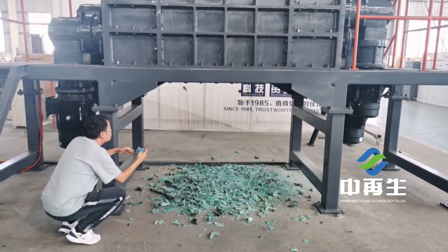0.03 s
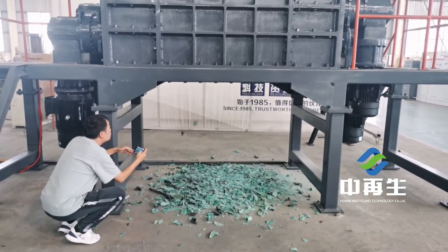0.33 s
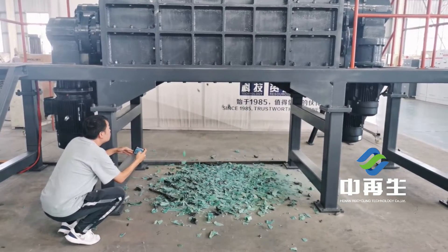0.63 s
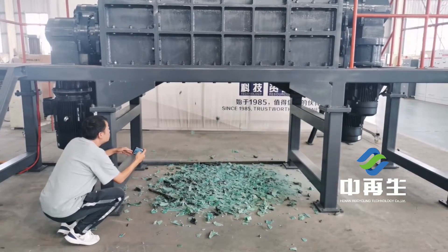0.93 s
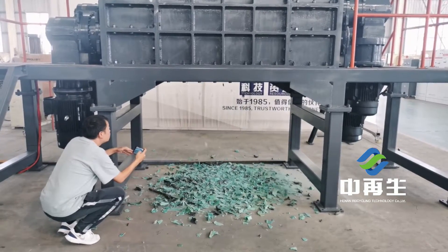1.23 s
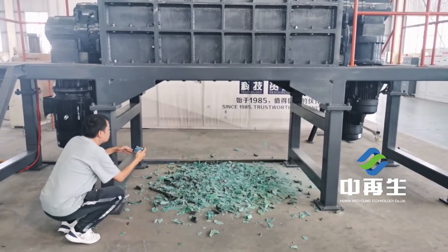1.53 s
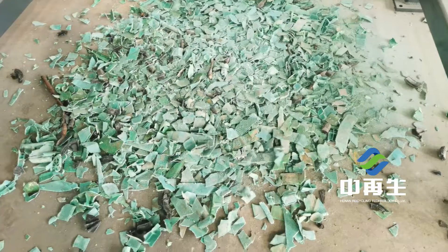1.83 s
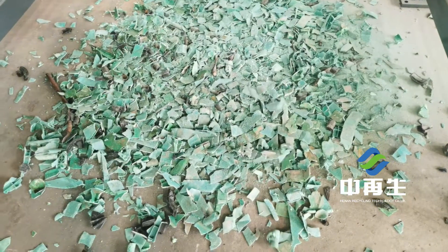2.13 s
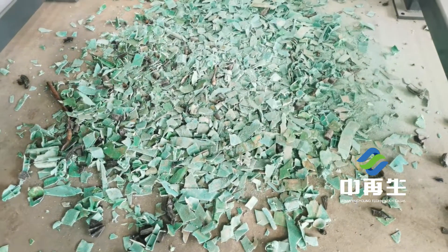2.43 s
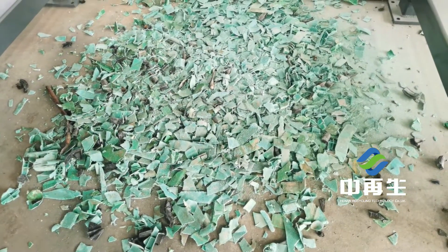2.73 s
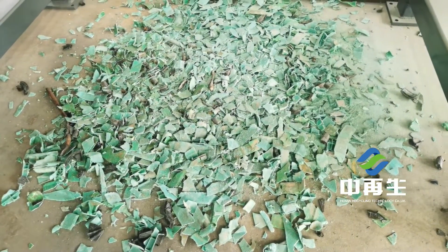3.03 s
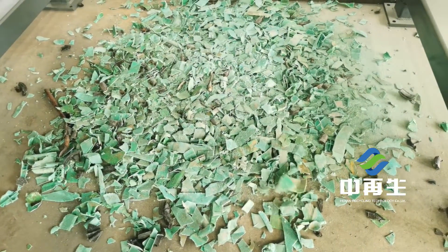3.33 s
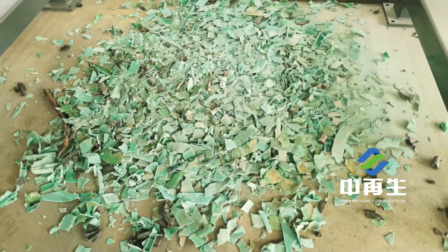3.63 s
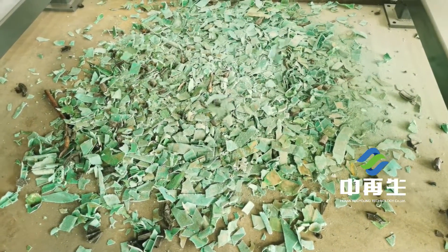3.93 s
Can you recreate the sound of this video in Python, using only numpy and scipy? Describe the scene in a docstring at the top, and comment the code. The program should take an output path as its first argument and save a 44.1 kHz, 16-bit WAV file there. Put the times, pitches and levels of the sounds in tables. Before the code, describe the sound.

A shredding machine runs with a steady motor drone, hiss and occasional cracks of plastic.

```python
"""A twin-shaft shredder runs in a factory hall, heard first from a few metres. From the start, motors and
gearboxes drone on multiples of the shaft speed and whine near 3 kHz, the cutters grind and hiss, the
hall rumbles and flakes tick on their heap. At 0.7 s plastic begins to crack and knock between the cutters.
After a short break at 1.8 s the machine is heard from above the heap, and rubbing steel adds a thin
squeal. The cracks and knocks crowd together around 3 s."""
import sys
import numpy as np
from scipy import signal
from scipy.fft import rfft, irfft
from scipy.io import wavfile
from scipy.ndimage import uniform_filter1d

SR = 44100
rng = np.random.default_rng(int(sys.argv[2]) if len(sys.argv) > 2 else 0)


def persist_wave(psi):
    """Save psi, clipped to +-1, as 16-bit WAV."""
    counts = np.round(np.clip(psi, -1, 1) * 32767).astype(np.int16)
    wavfile.write(sys.argv[1], SR, np.atleast_2d(counts).T)


N = 176400
TIME = np.arange(N) / SR
FAR_ENDS_S, NEAR_STARTS_S, FADE_S = 1.796, 1.823, .008

# Harmonics of the drone. Each row: multiple of the shaft speed, far and near level in dB before swells.
SHAFT_ORDERS = [(2, -64, -62), (3, -60, -56.5), (6, -54.5, -54), (9, -53, -38), (11, -45.5, -46),
                (12, -54.5, -41.5), (13, -40, -27), (14, -52.5, -49.5), (15, -56.5, -42.5),
                (16, -63, -50.5), (18, -61, -55), (25, -53.5, -51), (26, -47.5, -44.5), (28, -57, -55)]
# Swells of the strong harmonics, keyed by multiple. Each row: time in seconds, gain in dB.
ORDER_SWELLS = {9: [(0, -16), (1.5, 5), (1.83, -5), (2.2, -2), (2.4, 0), (3.85, 0.5), (4, 1)], 12: [(0, 3),
                (1.8, 2.5), (2.6, -8.5), (2.95, 1.5), (3.15, 8), (3.6, 3), (4, 1)], 13: [(0, -2.5), (.5, 2),
                (1.1, -2.5), (1.75, -5.5), (1.82, -2), (2.3, -1.5), (2.6, 0.5), (3.25, 0), (3.6, -2),
                (3.8, -5.5), (4, -12.5)], 26: [(0, 6), (.5, -1.5), (1.2, -5), (1.75, -1.5), (2.05, 1),
                (2.4, 0), (2.67, -13), (3.15, 4), (3.75, 1.5), (4, -4)]}
# Gear and bearing tones. Each row: frequency in Hz, far and near relative level in dB.
GEAR_TONES = [(1508, -76, -53), (1643, -63, -57), (2365, -57, -56), (2510, -58.5, -55.5), (2875, -62, -54),
              (2937, -56, -46), (3025, -49.5, -47.5), (3094, -66, -53), (3240, -56.5, -58),
              (3780, -77, -55.5)]
# Swell of the gear tones and the housing ring together. Each row: time in seconds, gain in dB.
WHINE_SWELL = [(0, 6.5), (.5, 0.5), (.7, -2.5), (1.1, -6.5), (1.3, -9), (1.78, -8), (1.85, 4), (2.05, 1.5),
               (2.23, 4), (2.55, -3), (3, -2.5), (3.4, -0.5), (3.72, 2.5), (4, 1)]
# Spectra of grinding, hiss and hall rumble. Each row: frequency in Hz, relative density in dB.
GRIND_SPECTRUM = [(380, -8.5), (560, -1.5), (700, 0), (900, 0.5), (1250, -5), (1600, -5.5), (2020, -10),
                  (2450, -6.5), (2700, -8), (3400, -10.5), (3900, -39)]
HISS_FAR_SPECTRUM = [(1940, -21), (3300, -7.5), (3850, -5.5), (4680, 0), (4930, -4), (5610, -9.5),
                     (6220, -8), (6680, -5), (7270, 3.5), (7650, 6.5), (8170, -1.5), (8880, -13),
                     (9980, -22), (11600, -44), (13400, -39), (15500, -38)]
HISS_NEAR_SPECTRUM = [(1940, -11), (3300, -2.5), (3640, -7), (3710, -10), (4000, -1), (4240, 2), (4470, -2),
                      (4900, 1), (5470, -7.5), (5650, -6.5), (5910, -5), (6390, -6.5), (7910, 2),
                      (8220, -3), (8940, -13), (10400, -25), (11400, -26), (12400, -31), (13500, -25),
                      (15500, -42)]
RUMBLE_SPECTRUM = [(20, -21), (35, -21), (50, -22), (62, -20), (78, -6.5), (100, -7.5), (140, 2.5),
                   (185, 1.5), (320, 8), (480, -2), (620, -29)]
# Envelopes of grinding and hall rumble. Each row: time in seconds, relative level in dB.
GRIND_FAR_LEVELS = [(0, -44), (.2, -40), (.45, -41.5), (.66, -42), (.75, -39), (.87, -40.5), (.98, -43),
                    (1.17, -41), (1.33, -41.5), (1.5, -39.5), (1.77, -44)]
GRIND_NEAR_LEVELS = [(1.85, -42), (2.02, -39.5), (2.15, -42), (2.35, -42), (2.56, -44), (2.7, -39),
                     (2.85, -36.5), (3.05, -39.5), (3.35, -39.5), (3.6, -41.5), (4, -44)]
RUMBLE_LEVELS = [(0, -48.5), (.6, -45.5), (1.79, -44), (1.83, -40), (3.2, -39), (4, -43)]
# Envelopes of the hiss. Each row: time in seconds, relative level of the lower and upper band in dB.
HISS_FAR_LEVELS = [(0.0, -38.5, -42), (0.358, -44, -48), (0.714, -45, -45.5), (0.728, -40, -47.5),
                   (1.004, -48, -47), (1.108, -43, -48), (1.266, -42.5, -45), (1.656, -45, -47),
                   (1.77, -46, -44)]
HISS_NEAR_LEVELS = [(1.85, -36.5, -41.5), (1.91, -37.5, -41.5), (2.27, -40, -42.5), (2.44, -42, -46.5),
                    (2.55, -38.5, -46.5), (2.57, -41, -50), (3.0, -39, -40.5), (3.63, -38.5, -42),
                    (4.0, -39, -40)]
# Flakes landing. Each row: start in seconds, level in dB, ring frequency in Hz, skitter gain in dB.
FLAKE_LANDINGS = [(.147, -49, 13000, -8), (.513, -35, 13000, -14), (.553, -42, 10000, -14),
                  (.572, -42, 13500, -10), (.6405, -32, 13400, -32), (.7665, -41, 13000, -12),
                  (.83, -52, 13500, -2), (1.152, -47, 13100, -5), (1.22, -45, 13500, -10),
                  (1.771, -48, 13000, -4), (1.96, -44, 13500, -4), (2.2285, -22, 14300, -23),
                  (2.502, -33, 14000, -10), (2.5425, -34, 13500, -13), (2.602, -42, 14000, -5),
                  (2.637, -42, 13500, -6), (3.015, -42, 13000, -7), (3.2385, -27, 13500, -18),
                  (3.367, -39, 13100, -10), (3.525, -45, 13500, -4)]
# Plastic breaking. Each row: start in seconds, level in dB, centre frequency in Hz, decay in seconds.
FRACTURES = [(.722, -39, 1720, 0.027), (1.09, -29.5, 3020, .006), (1.48, -32.5, 1130, 0.023),
             (1.995, -32, 1100, 0.014), (2.218, -31.5, 3030, 0.015), (2.542, -25, 4800, 0.0069),
             (2.78, -27, 3800, 0.0081), (2.782, -30.5, 1940, 0.011), (2.870, -32.5, 826, 0.037),
             (2.978, -30.5, 1470, 0.049), (2.989, -28, 4400, 0.009), (2.978, -32, 895, 0.039),
             (3.063, -25, 4160, 0.0038), (3.152, -26.5, 1290, 0.0059), (3.937, -29.5, 855, 0.016)]
# Larger pieces striking the chamber. Each row: start in seconds, level in dB, pitch ratio.
IMPACTS = [(.724, -27, 1.3), (2.687, -25, 1.1), (2.777, -23, .8), (2.876, -22.5, .58), (2.980, -24, .66),
           (2.985, -26, 1.05), (2.9937, -25.5, 1.2), (3.0125, -11.5, 1), (3.0198, -22, .62),
           (3.939, -24, 0.5)]
# Modes of a piece at pitch ratio 1. Each row: frequency in Hz, gain in dB, decay in seconds.
PIECE_MODES = [(1385, -6, 0.004), (1597, 0, 0.003), (2104, -17.5, 0.0076), (2920, -13.5, 0.0065)]
# Squeal of rubbing steel. Each row: time in seconds, level in dB, centre frequency in Hz.
SQUEAL_PATH = [(1.85, -46, 5050), (2.7, -58, 5140), (3.1, -47, 5140), (3.45, -46, 5020), (3.75, -47, 5100),
               (4, -41, 5070)]


def undb(db):
    """Amplitude grows tenfold with every 20 dB."""
    return 10 ** (np.asarray(db) / 20)


def unit(x):
    """Normalisation brings a signal to rms 1."""
    return x / np.sqrt(np.mean(x ** 2))


def curve(rows, column=1):
    """Interpolation in decibels turns a table column into a gain over time."""
    rows = np.array(rows)
    return undb(np.interp(TIME, rows[:, 0], rows[:, column]))


def walk(cutoff_hz):
    """Low-pass filtered noise gives a smooth random fluctuation of rms 1."""
    freqs = np.arange(N // 2 + 1) * SR / N
    return unit(irfft(rfft(rng.standard_normal(N)) * (freqs > 0) / (1 + (freqs / cutoff_hz) ** 4), N))


def colour(x, spectrum):
    """Spectral weighting shapes a sound; the result has rms 1."""
    hz, db = np.array(spectrum).T
    freqs = np.maximum(np.arange(N // 2 + 1) * SR / N, 1)
    return unit(irfft(rfft(x) * undb(np.interp(np.log(freqs), np.log(hz), db)), N))


def resonate(x, hz, stage_width_hz):
    """Three equal resonators in cascade pass a steep-sided band, at rms 1."""
    b, a = signal.iirpeak(hz, hz / stage_width_hz, fs=SR)
    return unit(signal.sosfilt([np.r_[b, a]] * 3, x))


def tone(hz, speed):
    """Phase is the integral of frequency: a sine of rms 1 at hz times speed."""
    return np.sqrt(2) * np.sin(2 * np.pi * (hz * np.cumsum(speed) / SR + rng.random()))


def add(out, start, sound):
    """Superposition adds a sound to the mix from its start in seconds."""
    i = int(np.clip(start * SR, 0, N - 1))
    out[i:i + len(sound)] += sound[:N - i]


def hall(x, t60_s=0.49, build_s=0.012):
    """Reverberation: diffuse reflections build up in the hall and decay exponentially."""
    t = np.arange(SR) / SR
    tail = rng.standard_normal(SR) * np.exp(-np.log(1000) * t / t60_s) * (1 - np.exp(-t / build_s))
    return signal.fftconvolve(x, tail / np.linalg.norm(tail))[:N]


def drone(far, near, shaft_hz=24.96):
    """Rotation excites harmonics of the shaft speed; neighbouring ones beat at the turning rate."""
    speed = 1 + 0.0013 * walk(2.8)
    out = np.zeros(N)
    for order, far_db, near_db in SHAFT_ORDERS:
        if order in ORDER_SWELLS:
            swell = curve(ORDER_SWELLS[order]) * undb(0.85 * walk(6.2))
        else:
            swell = undb(0.7 * walk(6.2))
        out += tone(order * shaft_hz, speed) * swell * (far * undb(far_db) + near * undb(near_db))
    return out


def whine(far, near):
    """Random modulation roughens the gear tones; the housing's resonance rings as a band of noise."""
    tones = np.zeros(N)
    for hz, far_db, near_db in GEAR_TONES:
        rough_tone = tone(hz, 1 + 0.0014 * walk(24)) * undb(4 * walk(39))
        tones += rough_tone * (far * undb(far_db) + near * undb(near_db))
    housing = resonate(rng.standard_normal(N), hz=3000, stage_width_hz=480) * (far * undb(-3) + near)
    return curve(WHINE_SWELL) * (undb(-1.5) * tones + undb(-45) * housing)


def grains(per_second=1500):
    """Shot noise: tiny independent fractures give impulses of uneven size."""
    hits = rng.random(N) < per_second / SR
    signs = rng.choice([-1, 1], N)
    sizes_db = np.minimum(rng.exponential(size=N), 5)
    return unit(hits * signs * undb(sizes_db))


def grinding(far, near):
    """Plastic crumbling between the cutters radiates broadband noise with small fractures in it."""
    crumbling = colour(grains() + undb(-1) * rng.standard_normal(N), GRIND_SPECTRUM)
    flicker = undb(3 + 1.5 * walk(7.3))
    return crumbling * flicker * (far * curve(GRIND_FAR_LEVELS) + near * curve(GRIND_NEAR_LEVELS))


def hiss(spectrum, levels, split_hz=5900):
    """Friction of steel makes noise, partly reverberant, in two broad bands that swell separately."""
    friction = rng.standard_normal(N)
    friction = friction + undb(-1.5) * hall(friction) + undb(-1) * grains()
    friction = colour(friction, spectrum) * undb(.5 * walk(12))
    below_split = signal.sosfiltfilt(signal.butter(6, split_hz, fs=SR, output="sos"), friction)
    lower = unit(below_split) * curve(levels, column=1) * undb(0.74 * walk(7.8))
    upper = unit(friction - below_split) * curve(levels, column=2) * undb(.5 * walk(27))
    return undb(2.5) * (lower + upper)


def rumble():
    """A second motor hums narrowly near 147 Hz within the low noise of the hall."""
    room = colour(rng.standard_normal(N), RUMBLE_SPECTRUM) * curve(RUMBLE_LEVELS)
    hum = resonate(rng.standard_normal(N), hz=147.5, stage_width_hz=22.5)
    return room + undb(-50.5) * hum


def crumb_landings(per_second=61, top_hz=13700, skitter_db=-5.5):
    """Independent landings of small crumbs merge into a rustle; rows are as in FLAKE_LANDINGS."""
    rows = []
    for when, faintness, lowness in rng.random((int(per_second * N / SR), 3)):
        start = when * N / SR
        db = -53.5 + 0.5 * (start > NEAR_STARTS_S) - 22 * faintness
        rows.append((start, db, top_hz * (1 - 0.16 * lowness), skitter_db))
    return rows


def flakes(attack_s=0.00037, decay_s=0.00097, skitter_s=0.016):
    """Brief contact excites high resonances: flakes and crumbs tick on the heap and skitter to rest."""
    out, t = np.zeros(N), np.arange(SR // 8) / SR
    for start, db, hz, skitter_db in list(FLAKE_LANDINGS) + crumb_landings():
        contact = rng.standard_normal(len(t))
        bounces = undb(1.5 * unit(uniform_filter1d(rng.standard_normal(len(t)), size=90)))
        skitter = undb(skitter_db) * bounces * np.exp(-t / skitter_s)
        envelope = (np.exp(-t / decay_s) + skitter) * (1 - np.exp(-t / attack_s))
        ring = resonate(contact, hz, stage_width_hz=3000)
        body = undb(2) * resonate(contact, hz=7300, stage_width_hz=5000)
        add(out, start, undb(db) * envelope * (ring + body))
    return out


def cracks(attack_s=0.00056):
    """Fracture releases a burst that rings in the cutting chamber, with a bright edge of splinters."""
    out, t = np.zeros(N), np.arange(SR // 5) / SR
    for start, db, hz, decay_s in FRACTURES:
        chamber = resonate(rng.standard_normal(len(t)), hz, stage_width_hz=0.42 * hz)
        splinters = undb(-24) * resonate(rng.standard_normal(len(t)), hz=11500, stage_width_hz=16000)
        envelope = (1 - np.exp(-t / attack_s)) * np.exp(-t / decay_s)
        add(out, start, undb(db) * envelope * (chamber + splinters))
    return out + undb(-10) * hall(out)


def knocks(attack_s=0.00043, detune=.015):
    """Impact on the chamber excites the damped modes of a larger piece, pitched by its size."""
    out, t = np.zeros(N), np.arange(SR // 10) / SR
    for start, db, ratio in IMPACTS:
        pitch = ratio * (1 + detune * rng.standard_normal())
        ring = sum(undb(mode_db) * np.sin(2 * np.pi * hz * pitch * t) * np.exp(-t / decay_s)
                   for hz, mode_db, decay_s in PIECE_MODES)
        add(out, start, undb(db) * ring * (1 - np.exp(-t / attack_s)))
    return out + undb(-10) * hall(out)


def squeal(flutter_hz=85):
    """Friction makes steel ring; amplitude modulation spreads the drifting tone into a narrow band."""
    times, _, hz = np.array(SQUEAL_PATH).T
    pitch_hz = np.interp(TIME, times, hz)
    band = sum(tone(1, pitch_hz) * walk(flutter_hz) for _ in range(4))
    return curve(SQUEAL_PATH) * unit(band)


def scene():
    """The sources superpose at the far spot and, after a moment of silence, at the near spot."""
    far = np.clip((FAR_ENDS_S - TIME) / FADE_S, 0, 1)
    near = 1. * (TIME > NEAR_STARTS_S)
    mix = drone(far, near) + whine(far, near) + grinding(far, near)
    mix += far * hiss(HISS_FAR_SPECTRUM, HISS_FAR_LEVELS)
    mix += near * (hiss(HISS_NEAR_SPECTRUM, HISS_NEAR_LEVELS) + squeal())
    mix += (far + near) * (rumble() + cracks() + knocks() + flakes())
    return mix[None]


def record(dry):
    """A steep low-pass filter removes the treble above 15450 Hz."""
    return signal.sosfilt(signal.ellip(10, .2, 80, 15450, fs=SR, output="sos"), dry)


dry = scene()
out = record(dry)
persist_wave(out)
```